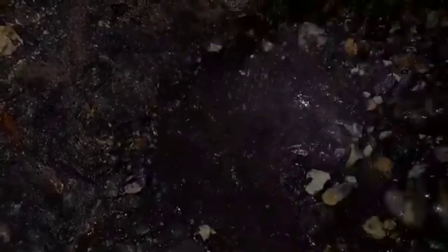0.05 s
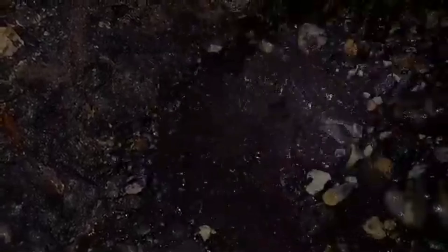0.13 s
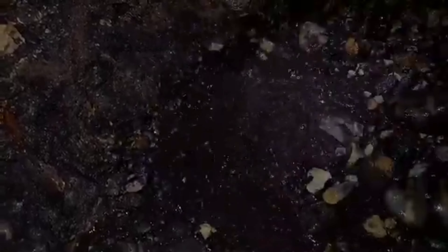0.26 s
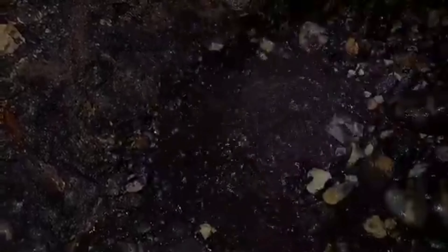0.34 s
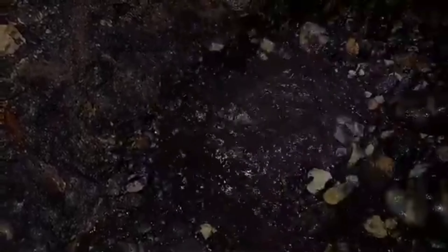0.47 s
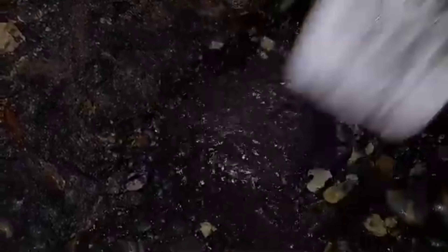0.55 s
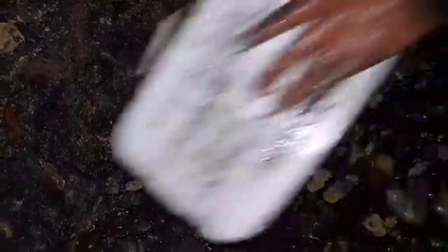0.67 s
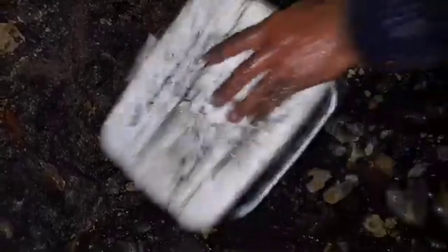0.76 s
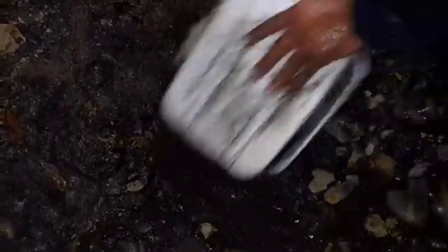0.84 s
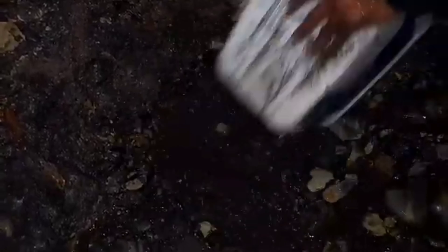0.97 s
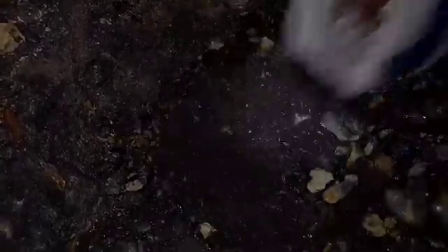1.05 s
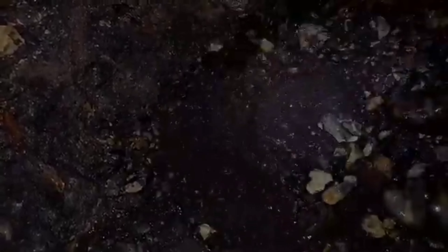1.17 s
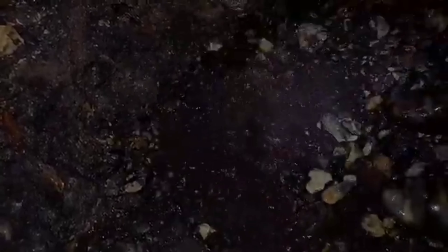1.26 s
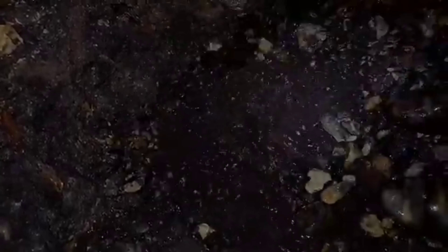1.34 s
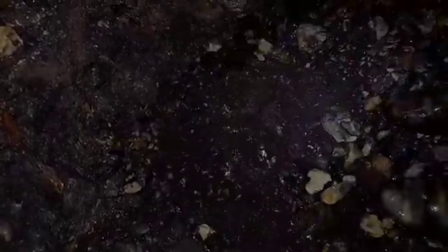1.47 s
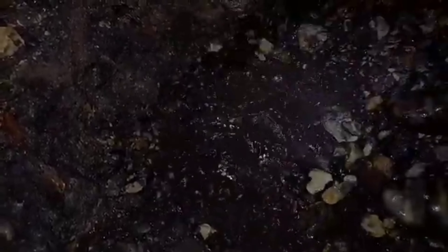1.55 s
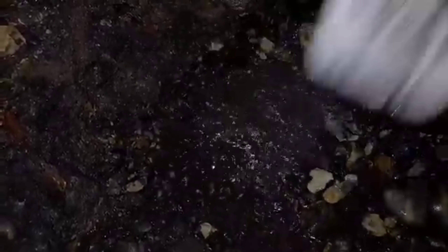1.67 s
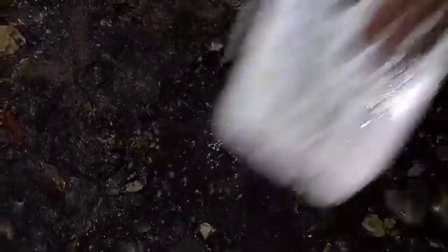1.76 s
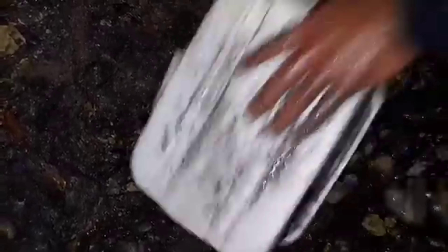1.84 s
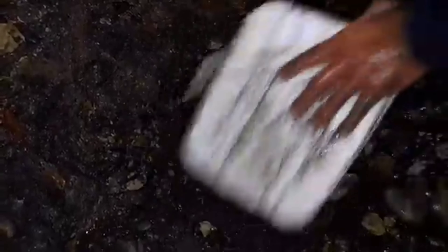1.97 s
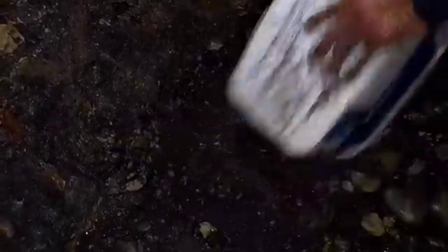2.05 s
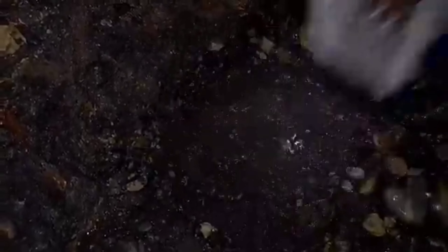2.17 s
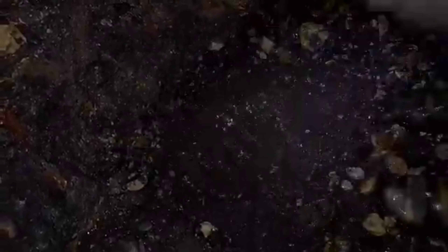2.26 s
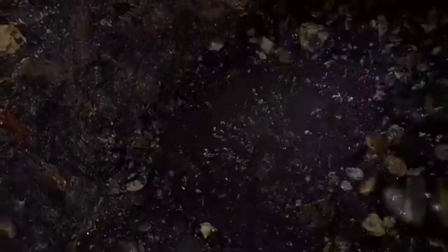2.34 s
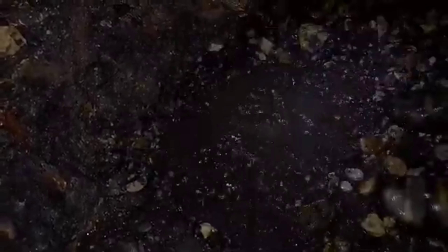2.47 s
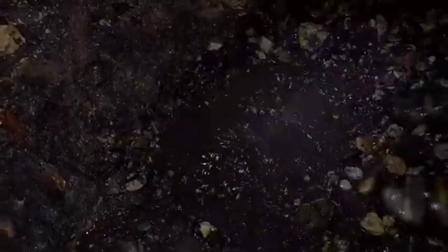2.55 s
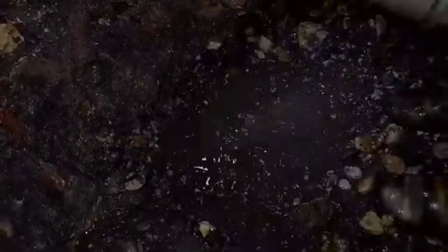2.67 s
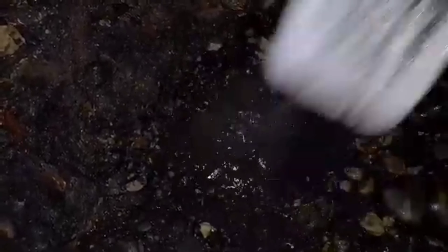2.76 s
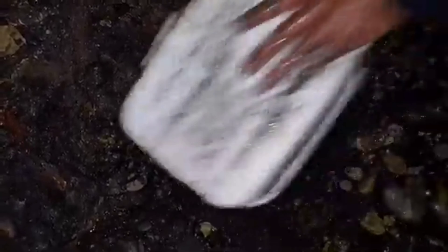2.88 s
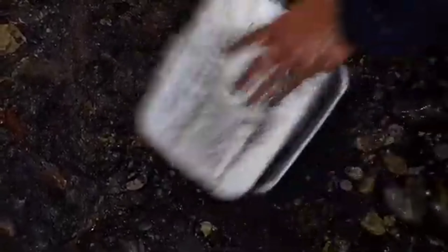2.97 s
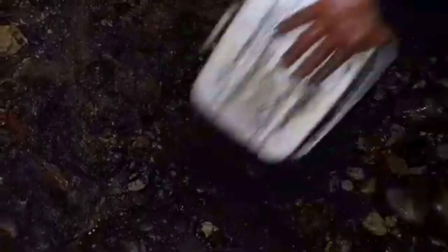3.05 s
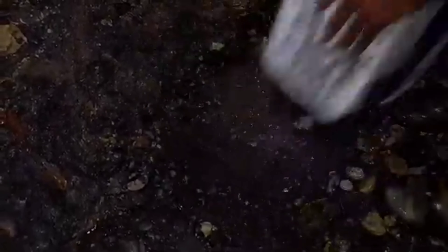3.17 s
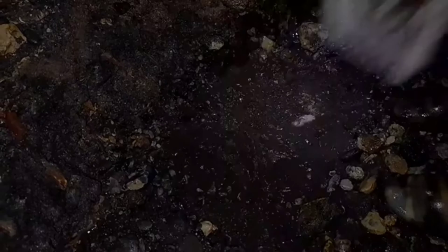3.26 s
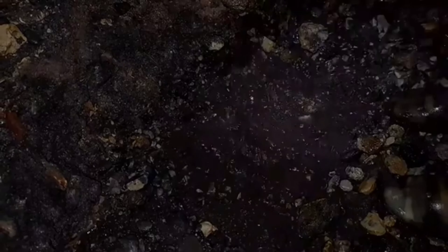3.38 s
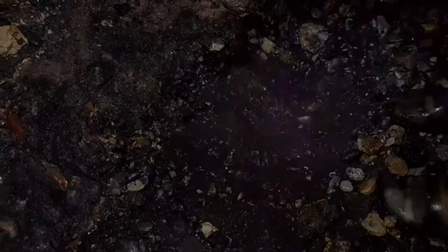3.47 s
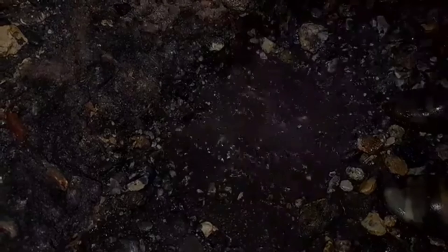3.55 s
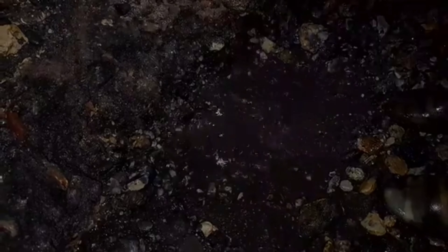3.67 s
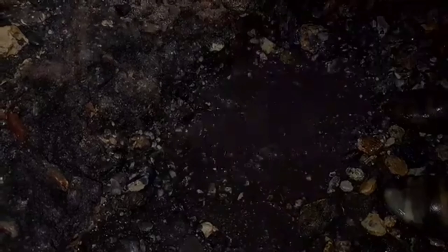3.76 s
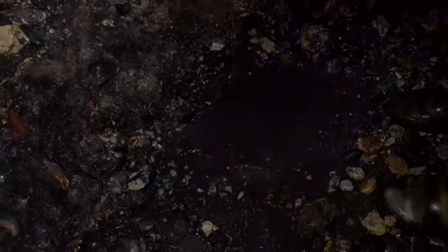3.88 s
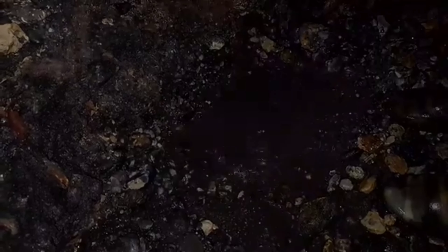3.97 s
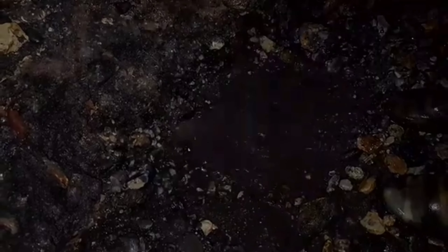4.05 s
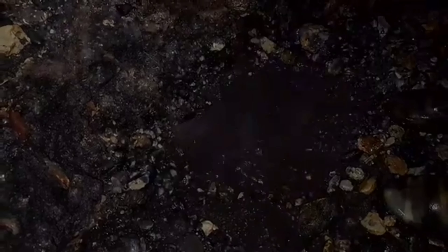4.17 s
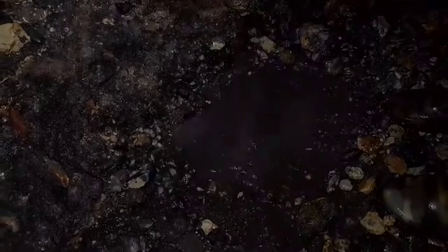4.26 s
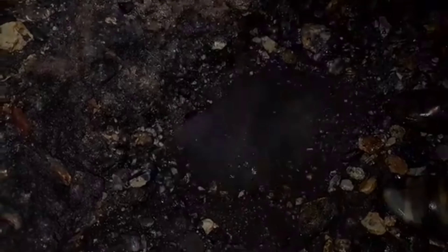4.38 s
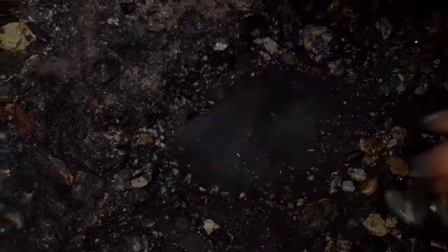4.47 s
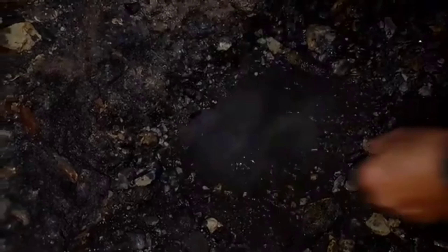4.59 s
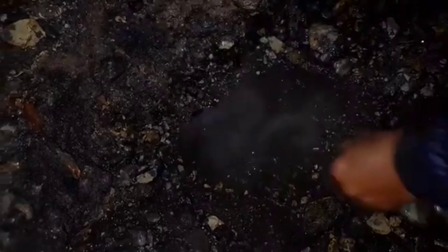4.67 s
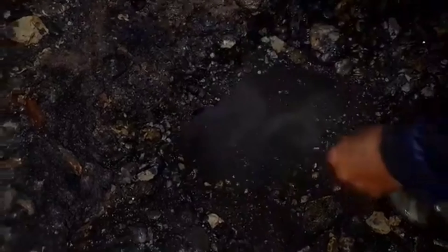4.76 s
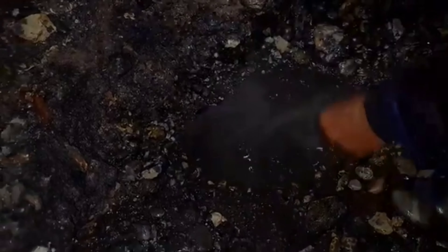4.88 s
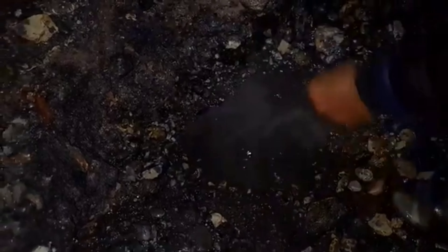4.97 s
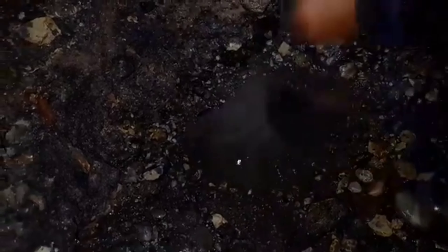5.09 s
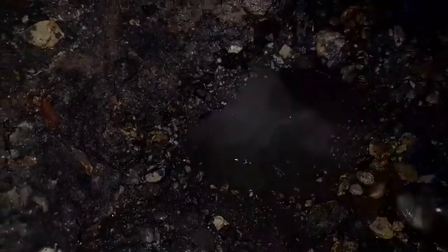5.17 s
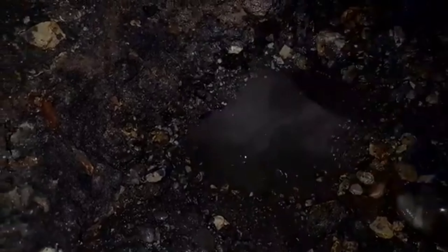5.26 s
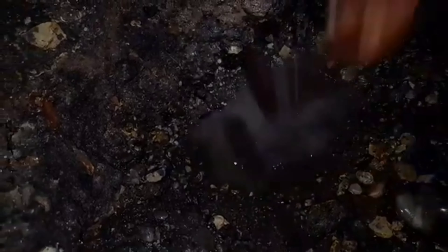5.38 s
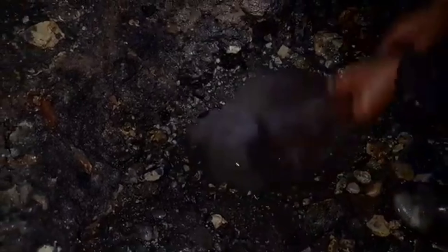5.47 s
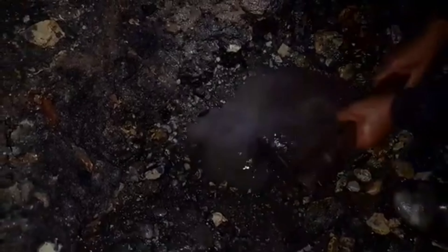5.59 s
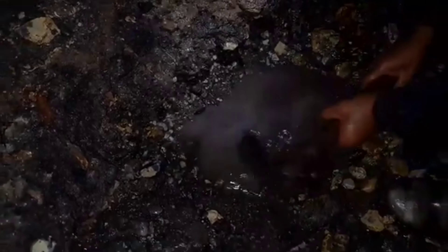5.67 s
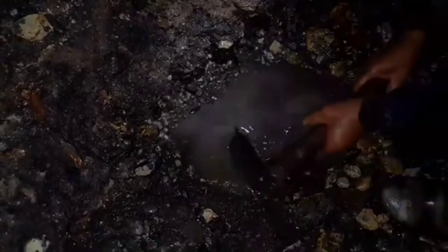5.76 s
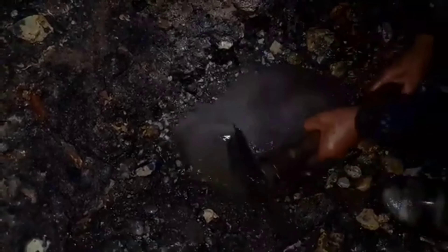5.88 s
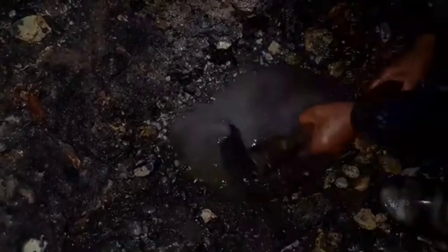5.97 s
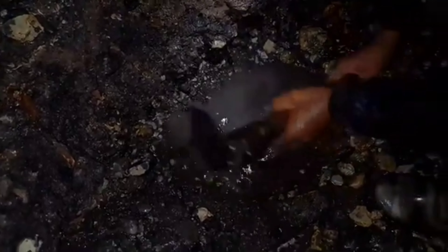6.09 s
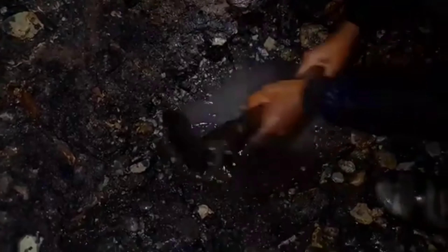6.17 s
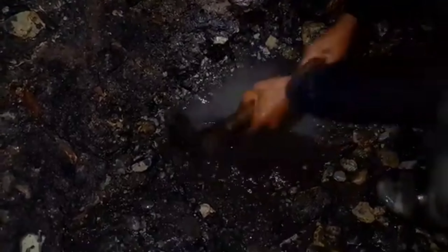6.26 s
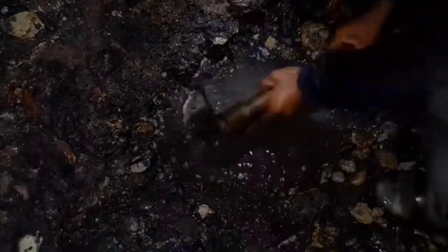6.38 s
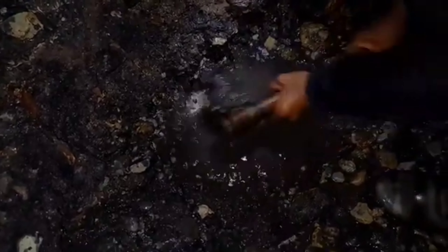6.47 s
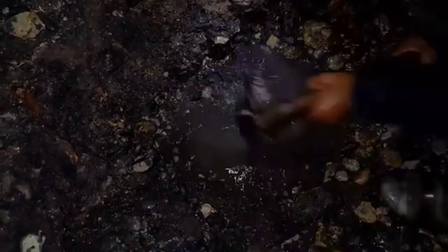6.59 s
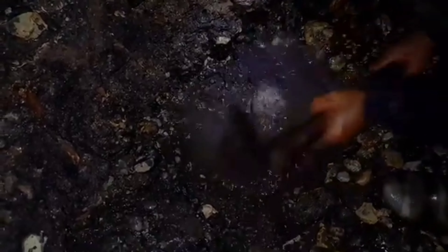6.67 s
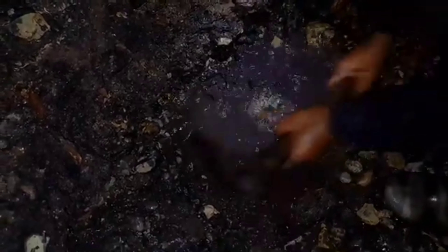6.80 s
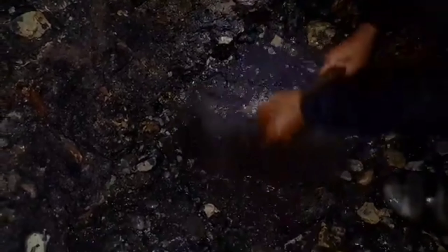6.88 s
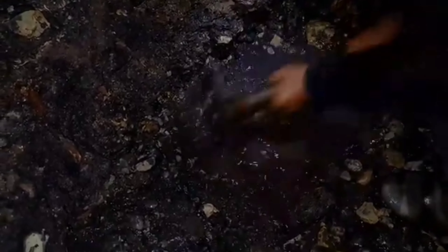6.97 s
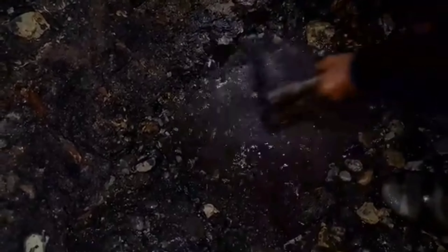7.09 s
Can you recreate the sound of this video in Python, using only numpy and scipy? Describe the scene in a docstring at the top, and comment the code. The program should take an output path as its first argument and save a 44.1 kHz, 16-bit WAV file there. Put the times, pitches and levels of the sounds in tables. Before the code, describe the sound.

Wet, hollow plastic scooping comes first, each stroke a hard slap, tumbling knocks, pebble clicks and brief bubbling, followed by trickles and drips. A calmer stretch has dull muddy thumps and light gravel rubbing. Then a steel blade bites stones with bright dry clinks, its wooden handle knocking, and crunchy wet scrapes. Microphones are very close, outdoors, with faint low wind buffeting.

```python
"""A plastic tub bails a pebbly shore pool, then a small steel hoe works the flooded gravel. From the start,
wind rumble (low-passed grains) shakes the microphones; from 4.5 s low thumps (damped sines) sound with it. The
tub slaps in, drags and drips (grains through its hollow), with knocks, cracks, bubbles and wall taps. From 4 s
the hoe rakes mud and gravel (coloured grains); from 5.6 s chops ring its steel blade and wooden handle."""
import sys
import numpy as np
from scipy import signal
from scipy.fft import rfft, irfft, next_fast_len
from scipy.io import wavfile
from scipy.ndimage import uniform_filter1d

SR = 44100
rng = np.random.default_rng(int(sys.argv[2]) if len(sys.argv) > 2 else 0)


def inscribe(sig):
    """Save sig as 16-bit PCM at rate SR to the path in sys.argv[1].

    A 1-D sig is mono; a 2-D sig holds one channel per row.
    Samples are clipped to [-1, 1] before scaling.
    """
    pcm = np.round(np.clip(np.atleast_2d(sig).T, -1, 1) * 32767)
    wavfile.write(sys.argv[1], SR, pcm.astype(np.int16))


N = 314433

# wind rumble: time_s, level_db
WIND_LEVEL = [(0, -42.5), (.6, -50.5), (1.1, -38.5), (1.45, -53.5), (1.8, -49), (2.62, -70), (3.0, -63),
              (3.45, -60.5), (3.85, -69), (4.3, -55), (4.9, -54.5), (5.75, -54.5), (6.1, -44.5),
              (7.13, -47)]
# rumble spectrum: freq_hz, gain_db
RUMBLE_SPECTRUM = [(13, -36), (40, -17), (80, 0), (130, -7), (200, -17), (320, -43)]
# low thumps: start_s, level_db, pitch_hz
LOW_THUMPS = [(4.478, -32, 112), (4.853, -32.5, 96.5), (5.005, -35, 111), (5.33, -33, 90.5),
              (5.705, -31, 121), (5.828, -34, 81), (5.859, -31, 82), (6.089, -46, 80.6), (6.153, -36, 66)]

# tub lowered through the shallows: full_s, end_s, slosh_db, grit_db, drum_db
TUB_DIPS = [(0.689, 0.886, -47.5, -57.5, -34), (1.835, 2.009, -46.5, -52.5, -42),
            (2.868, 3.045, -56.5, -58, -48), (3.65, 3.798, -75, -61.5, -62)]
# scoops: slap_s, lift_s, slosh_db, grit_db, drum_db, drain_db, drain_drum_db, drain_fade_db_per_s
TUB_SCOOPS = [(-0.3, 0.006, -20.5, -35, -23.5, -45.5, -34, 50),
              (0.916, 1.205, -26.5, -33, -22.5, -44.5, -38.5, 53),
              (2.027, 2.25, -39, -39, -20, -38, -27.5, 71.5),
              (3.088, 3.321, -42, -45, -27, -46, -42.5, 78.5)]
# rim slapping in or catching on stones: peak_s, rise_db_per_s, slosh_db, grit_db
RIM_JOLTS = [(0.916, 2602, -16.5, -32), (2.035, 2997.5, -17, -47), (2.214, 402, -29, -38.5),
             (3.096, 2697, -39, -31.5), (3.193, 445, -21.5, -39.5), (3.314, 192.5, -33.5, -36.5)]
# resonances of the tub's hollow: freq_hz, width_hz, gain_db
TUB_MODES = [(150.5, 49, -5.5), (275, 68, 0), (355, 97, 2.5)]
# resonances of the plastic wall: freq_hz, width_hz, gain_db
WALL_MODES = [(1137, 34, -2), (1450, 130, -10.5)]
# slosh spectrum at the tub: freq_hz, gain_db
TUB_SLOSH_SPECTRUM = [(250, -10), (480, -0.5), (1500, -8.5), (3000, -24), (5000, -67.5)]
# grit spectrum, tub and hoe: freq_hz, gain_db
GRIT_SPECTRUM = [(1060, -6.5), (1800, -5), (3250, -7.5), (7780, -14), (13200, -12), (15800, -18.5)]
# left-right likeness of the near sounds: freq_hz, likeness_0_to_1
STEREO_LIKENESS = [(60, 1), (250, 0.74), (600, 0.53), (1400, 0.07)]
# single drops and gurgles: start_s, level_db, start_pitch_hz, phase_rise_per_life (pitch rises by twice this)
DROPS = [(4.062, -48, 558, 0.068), (4.211, -51.5, 600, 0.043), (6.705, -37.5, 559, 0.07),
         (6.743, -47, 1170, 0.05), (6.776, -38.5, 1580, 0.03)]
# stones and water knocking the tub or the soft pool bed: start_s, level_db, hollow_hz
TUB_KNOCKS = [(0.016, -25, 348), (0.039, -17.5, 346), (0.648, -16.5, 338), (0.918, -10, 230),
              (1.027, -3, 280), (1.046, -5, 259), (1.09, -10, 242), (1.197, -6, 318), (1.534, -35.5, 443),
              (1.798, -15.5, 328), (2.03, -7.5, 253), (2.052, -1.5, 359), (2.08, -8, 348),
              (2.132, -5.5, 283), (2.212, -6.5, 260), (2.243, -21, 375), (2.31, -13.5, 305),
              (2.364, -14, 344), (2.428, -14, 290), (2.55, -36.5, 325), (2.848, -16.5, 290),
              (3.09, -13, 217), (3.148, -6, 238), (3.172, -6.5, 302), (3.182, -7, 248), (3.197, -1, 340),
              (3.251, -17, 225), (3.315, -22, 195), (3.47, -30.5, 371), (4.369, -22.5, 380),
              (4.42, -27.5, 370), (4.469, -23, 350), (4.543, -28.5, 340), (4.735, -36.5, 337),
              (4.814, -36, 346), (4.834, -37, 364), (5.001, -29.5, 487)]
# gritty cracks of pebbles and splashes: start_s, level_db, centre_hz
PEBBLE_CRACKS = [(0.017, -18, 1550), (0.142, -36.5, 745), (0.326, -45.5, 1990), (0.917, -20, 766),
                 (0.963, -23.5, 1460), (0.977, -19.5, 1600), (1.136, -20, 1410), (1.268, -34.5, 1720),
                 (1.332, -38.5, 4100), (1.369, -34, 1500), (1.417, -28.5, 3000), (1.495, -41, 4440),
                 (2.032, -19.5, 1130), (2.092, -18, 5000), (2.13, -14, 1300), (2.193, -19, 1120),
                 (2.303, -28.5, 2630), (2.364, -28, 710), (2.512, -36, 840), (2.658, -47.5, 690),
                 (2.749, -37, 1210), (2.811, -42.5, 4060), (3.089, -11, 1440), (3.169, -21, 1480),
                 (3.25, -21.5, 1420), (3.298, -21, 1800), (3.315, -29, 2480), (3.433, -38, 694),
                 (3.527, -50, 4800), (4.371, -25.5, 703), (4.414, -35.5, 1580), (4.45, -34.5, 714),
                 (4.606, -50, 2020), (4.785, -45.5, 1980), (4.997, -41, 880), (5.633, -28, 420),
                 (6.855, -36, 990)]
# pebbles tapping the tub's wall: start_s, level_db
WALL_TAPS = [(2.0332, -22.5), (2.0812, -13), (2.0993, -18), (2.143, -12.5), (2.2208, -19.5), (3.095, -15.5)]

# hoe strokes: full_s, end_s, rise_db_per_s, slosh_db, grit_db, sag_db_per_s
HOE_STROKES = [(3.991, 4.066, 306, -78.5, -64.5, 3.5), (4.075, 4.164, 602, -47.5, -62, 1),
               (4.218, 4.35, 300, -59, -68.5, -8), (4.38, 4.586, 2001, -39, -56.5, 55),
               (4.627, 4.653, 248, -43.5, -50, 14), (4.775, 4.853, 243, -45.5, -54.5, 14),
               (4.89, 5.077, 317, -49.5, -59, -2), (5.217, 5.42, 112, -53, -53.5, -6),
               (5.461, 5.657, 900, -48.5, -44, -2), (5.705, 5.855, 300, -44.5, -48, -40),
               (5.927, 6.04, 300, -52.5, -56.5, -15), (6.122, 6.37, 297, -50, -56, -10),
               (6.383, 6.474, 2500, -27, -33, 16), (6.582, 6.827, 131, -37.5, -36.5, 65),
               (6.902, 6.955, 300, -49.5, -50.5, 5), (7.01, 7.058, 400, -34, -33, -2),
               (7.074, 7.106, 700, -22, -32.5, 3)]
# mud slosh spectrum at the hoe: freq_hz, gain_db
HOE_SLOSH_SPECTRUM = [(110, -6.5), (200, -11.5), (360, 3.5), (800, -5.5), (2200, -8.5), (5000, -78)]
# blade striking stone: start_s, blade_db, handle_db
HOE_CHOPS = [(5.6321, -15, -30), (5.65, -27, -33), (6.376, -11, -27), (6.4191, -22, -19),
             (6.4594, -26, -28), (6.746, -32.5, -55), (6.962, -33.5, -56), (6.9773, -21.5, -50),
             (7.0035, -17, -39), (7.019, -13, -23.5), (7.0755, -18, -12.5)]
# resonances of the steel blade: freq_hz, width_hz, gain_db
BLADE_MODES = [(3130, 39, -21), (4240, 220, 6), (5580, 350, -3.5), (7200, 450, -1.5), (9900, 69, 3),
               (11800, 940, -1)]
# resonances of the wooden handle: freq_hz, width_hz, gain_db
HANDLE_MODES = [(610, 65, -1), (1880, 50, -9)]

DIP_RISE_DB_PER_S, SLAP_RISE_DB_PER_S, DRAG_RISE_DB_PER_S = 290, 4400, 1500
DIP_FALL_DB_PER_S, JOLT_FALL_DB_PER_S, LIFT_FALL_DB_PER_S = 650, 1140, 403
DIP_SAG_DB_PER_S, DIP_DRUM_SAG_DB_PER_S, DRAG_SAG_DB_PER_S = 23, 155, 14
STROKE_FALL_DB_PER_S = 380
DRAG_LAG_S = 0.051  # drag after slap
DRAIN_GRIT_DB, STILL_DB = -4, -80  # grit over slosh while draining; pool at rest
PEBBLE_EXPONENT = 1.257  # clicks swing wider in dB than the grit that stirs them
TOP_HZ = 15800


def amp(db):
    """dB to linear gain."""
    return 10 ** (np.asarray(db) / 20)


def unit(x):
    """Scale to rms 1 over the whole array."""
    return x / np.sqrt(np.mean(x ** 2) + 1e-20)


def along(points, hz):
    """Interpolate (freq_hz, value) points on a log axis."""
    f, v = np.transpose(points)
    return np.interp(np.log(hz + 1), np.log(f + 1), v)


def curves(rows):
    """One gain per sample for each dB column after the time; -120 dB outside the table."""
    s, *columns = np.transpose(rows)
    t = np.arange(N) / SR
    return [amp(np.interp(t, s, db, left=-120, right=-120)) for db in columns]


def swells(full_s, end_s, rise, sag, fall, *levels_db):
    """Summed gains of events that rise to full, sag, then fall from their end (dB/s); one per level column."""
    t = np.arange(0, N / SR + .002, .001)
    full_s, end_s, rise, sag = (np.reshape(v, (-1, 1)) for v in (full_s, end_s, rise, sag))
    attack_db = rise * np.minimum(t - full_s, 0)
    sag_db = sag * np.maximum(t - full_s, 0)
    fall_db = fall * np.maximum(t - end_s, 0)
    shape = amp(attack_db - sag_db - fall_db)
    return np.array([np.interp(np.arange(N) / SR, t, amp(db) @ shape) for db in levels_db])


def filtered(x, response):
    """x through a complex response of frequency."""
    m = next_fast_len(N + SR // 2)
    return irfft(rfft(x, m) * response(np.fft.rfftfreq(m, 1 / SR)), m)[..., :N]


def modes(table):
    """Causal response of summed resonances, alternating in sign."""
    def response(f):
        total = 0
        for k, (hz, width_hz, db) in enumerate(table):
            resonance = 1j * f * width_hz / (hz * hz - f * f + 1j * f * width_hz)
            total = total + (-1) ** k * amp(db) * resonance
        return total
    return response


def colour(spectrum):
    """Zero-phase response following a dB spectrum."""
    return lambda f: amp(along(spectrum, f))


def grains(rate_hz, life_s, spread_db, bed):
    """Two unrelated noises, rms 1, under one train of uneven contacts on a steady bed, coloured in brief patches."""
    hits = (rng.random(N) < rate_hz / SR) * amp(spread_db * rng.standard_normal(N))
    decay = np.exp(-np.arange(SR // 20) / SR / life_s)
    envelope = unit(signal.fftconvolve(hits, decay)[:N]) + bed
    z = signal.stft(envelope * rng.standard_normal((2, N)), nperseg=512)[2]
    patches = uniform_filter1d(rng.standard_normal(z.shape[1:]), size=3, axis=0)  # over frequency
    patches = uniform_filter1d(patches, size=5, axis=1)  # over time
    return unit(signal.istft(z * amp(3 * unit(patches)), nperseg=512)[1][:, :N])


def bursts(starts_s, gains, t60s):
    """Two unrelated noises that start sharply at each time and die away."""
    out, t = np.zeros((2, N + SR)), np.arange(SR // 5) / SR
    for s, gain, t60 in zip(starts_s, gains, t60s):
        fade = amp(-60 * t / t60) * (1 - np.exp(-t / 0.00023))
        out[:, round(s * SR):][:, :len(t)] += gain * fade * rng.standard_normal((2, len(t)))
    return out[:, :N]


def pings(start_s, gain, hz, cycles, rise, lag, size=1300):
    """Stereo damped sines that may glide up; each sounds on the right lag samples after the left."""
    t = np.arange(size) / SR
    life = (cycles / hz)[:, None]
    phase = 2 * np.pi * hz[:, None] * t * (1 + rise * t / life)
    onset = (1 - np.exp(-4 * t / life)) ** 2
    wave = gain[:, None] * np.sin(phase) * np.exp(-t / life) * onset
    channels = []
    for side in (-1, 1):
        first = np.round(start_s * SR + side * lag / 2 + 40).astype(int)  # 40 samples of margin
        index = first[:, None] + np.arange(size)
        channels.append(np.bincount(index.ravel(), wave.ravel(), N + SR)[40:N + 40])
    return np.array(channels)


def swarm(centre_hz, octaves, cycles, rise, spread_db, count, size):
    """Many small ringing grains at random moments, pitches and places, rms 1."""
    when, place = rng.random((count, 2)).T
    pitch, big = rng.standard_normal((count, 2)).T
    hz = np.clip(centre_hz * 2 ** (octaves * pitch), 300, 15000)
    return unit(pings(when * N / SR, amp(spread_db * big), hz, cycles, rise, 50 * (place - .5), size=size))


def spread(pair):
    """Two unrelated signals become left and right: alike in the bass, unrelated in the treble."""
    def mid_side(hz):
        angle = np.arccos(np.clip(along(STEREO_LIKENESS, hz), -1, 1)) / 2
        return np.array([np.cos(angle), np.sin(angle)])
    mid, side = filtered(pair, mid_side)
    return np.array([mid + side, mid - side])


def wind():
    """Gusts on the microphones: low noise partly different at each. Short damped low thumps sound along with
    it."""
    mid, side = filtered(grains(50, 0.011, 1.5, bed=0.94), colour(RUMBLE_SPECTRUM))
    rumble = unit(np.array([mid + 0.98 * side, mid - side]))
    s, db, hz = np.transpose(LOW_THUMPS)
    bumps = pings(s, amp(db + 2.5), hz, 1.32, 0, 8 + 0 * s, size=6000)
    return curves(WIND_LEVEL)[0] * rumble + bumps


def bailing():
    """Slosh, grit and drum gains of the tub: dip, slap, drag with jolts, lift and drain."""
    full, end, slosh, grit, drum = np.transpose(TUB_DIPS)
    wet = swells(full, end, DIP_RISE_DB_PER_S, DIP_SAG_DB_PER_S, DIP_FALL_DB_PER_S, slosh, grit)
    hollow = swells(full, end, DIP_RISE_DB_PER_S, DIP_DRUM_SAG_DB_PER_S, DIP_FALL_DB_PER_S, drum)

    slap, lift, slosh, grit, drum, drain, drain_drum, fade = np.transpose(TUB_SCOOPS)
    drag_sag = DRAG_SAG_DB_PER_S * (slap > 0)  # a drag under way at the start holds level
    wet += swells(slap + DRAG_LAG_S, lift, DRAG_RISE_DB_PER_S, drag_sag, LIFT_FALL_DB_PER_S, slosh, grit)
    hollow += swells(slap, lift, SLAP_RISE_DB_PER_S, 0, LIFT_FALL_DB_PER_S, drum)
    draining = swells(lift, lift, LIFT_FALL_DB_PER_S, fade, 0, drain, drain + DRAIN_GRIT_DB, drain_drum)

    s, rise, slosh, grit = np.transpose(RIM_JOLTS)
    wet += swells(s, s, rise, 0, JOLT_FALL_DB_PER_S, slosh, grit)
    wet += draining[:2] + amp(STILL_DB)
    return *wet, hollow[0] + draining[2]


def tub(slosh, grit, drum):
    """Dragged over stones the tub drums hollowly; water sloshes and grit hisses along its rim."""
    drumming = unit(filtered(grains(60, 0.0055, 1.8, bed=1.0), modes(TUB_MODES)))

    def slosh_response(f):
        return colour(TUB_SLOSH_SPECTRUM)(f) * (.5 + 0.35 * abs(modes(WALL_MODES)(f)))
    sloshing = unit(filtered(grains(90, 0.01, 9.5, bed=0.64), slosh_response))
    hiss = unit(filtered(grains(120, 0.018, 7, bed=0.6), colour(GRIT_SPECTRUM)))
    return amp(-7.0) * drum * drumming + amp(-7.5) * slosh * sloshing + amp(-2.5) * grit * hiss


def water(tub_slosh, tub_grit, hoe_slosh, hoe_grit):
    """Bubbles ring and wet pebbles click wherever tub or hoe stirs the pool; single drops glide up in pitch."""
    bubbles = swarm(1203.0, 0.605, cycles=6.3, rise=0.024, spread_db=-0.5, count=900, size=1200)
    pebbles = swarm(3400, .7, cycles=9, rise=0, spread_db=4, count=5000, size=400)
    s, db, hz, rise = np.transpose(DROPS)
    drops = pings(s, amp(db + 11.0), hz, 7.44, rise[:, None], 8 + 0 * s, size=2600)
    bubble_gain = amp(-5.5) * (tub_slosh + hoe_slosh / 2)
    pebble_gain = amp(8.0) * (tub_grit + 0.54 * hoe_grit) ** PEBBLE_EXPONENT
    return bubble_gain * bubbles + pebble_gain * pebbles + drops


def knocks():
    """Each knock rings the hollow, its pitch changing as the tub fills, and thuds lower through the wet ground."""
    s, db, hz = np.transpose(TUB_KNOCKS)
    hollow = pings(s, amp(db - 0.5), hz, 2.14, 0, 4 + 0 * s, size=3000)
    thud = pings(s, amp(db - 13.5), 0.462 * hz, 2.43, 0, 0 * s, size=3000)
    return hollow + thud


def cracks():
    """A short noise burst with a broad peak set by the size of the pebble or drop."""
    out, t = np.zeros((2, N + SR)), np.arange(SR // 8) / SR
    for s, db, hz in PEBBLE_CRACKS:
        noise = rng.standard_normal((2, len(t)))
        peak = signal.lfilter(*signal.iirpeak(hz, 2.5, SR), noise)
        fade = amp(db - 6.5 - 60 * t / 0.072) * (1 - np.exp(-t / 0.00082))
        out[:, round(s * SR):][:, :len(t)] += fade * unit(peak + 0.0058 * noise)
    return out[:, :N]


def wall_rasps():
    """Each pebble tap is a short rasp into the modes of the plastic wall."""
    s, db = np.transpose(WALL_TAPS)
    return filtered(bursts(s, amp(db + 19.5), 0.054 + 0 * s), modes(WALL_MODES))


def raking():
    """Slosh and grit gains of the hoe strokes."""
    full, end, rise, slosh, grit, sag = np.transpose(HOE_STROKES)
    return swells(full, end, rise, sag, STROKE_FALL_DB_PER_S, slosh, grit)


def hoe(slosh, grit):
    """Mud sloshes; gravel rubs the blade, which rings faintly and hums in its handle; chops ring it harder."""
    mud = unit(filtered(grains(120, 0.01, 3.5, bed=0.5), colour(HOE_SLOSH_SPECTRUM)))
    contact = grains(150, 0.035, 2.4, bed=1.17)

    def rub_response(f):
        return colour(GRIT_SPECTRUM)(f) * (1.1 + 0.5 * abs(modes(BLADE_MODES)(f)))
    rub = unit(filtered(contact, rub_response))
    hum = unit(filtered(contact, modes(HANDLE_MODES)))

    s, db, _ = np.transpose(HOE_CHOPS)
    strikes = bursts(s, amp(db - 3.0), 0.095 + 0 * s)
    steel = filtered(strikes, lambda f: 0.26 * (f > 1200) + modes(BLADE_MODES)(f))

    # from 5.5 to 6 s the blade leaves the puddle and bites into gravel
    biting = np.clip((np.arange(N) / SR - 5.5) / .5, 0, 1)
    low = amp(-7.5 - 7.4 * biting) * mud + amp(-11.0) * biting * hum
    return slosh * low + amp(-1.5) * grit * rub + steel


def handle():
    """Each chop rings the wooden handle's modes, a little off their usual pitch."""
    s, _, handle_db = np.transpose(HOE_CHOPS)
    detune = 1 + 0.047 * rng.standard_normal(len(s))
    out = 0
    for hz, width_hz, level_db in HANDLE_MODES:
        gain = amp(handle_db + level_db + 6.5)
        cycles = hz / width_hz / np.pi
        out = out + pings(s + 0.00369, gain, hz * detune, cycles, 0, 6 + 0 * s, size=2000)
    return out


def scene():
    """Tub, water and hoe, slightly louder on the right, under the wind."""
    bail, rake = bailing(), raking()
    rubbed = amp(4) * spread(tub(*bail) + cracks() + wall_rasps() + hoe(*rake))
    near = rubbed + water(*bail[:2], *rake) + knocks() + handle()
    return near * amp([[-.4], [.4]]) + wind()


def record(dry):
    """Steep low-pass at TOP_HZ."""
    return filtered(dry, lambda hz: 1 / (1 + (hz / TOP_HZ) ** 120))


dry = scene()
out = record(dry)
inscribe(out)
```